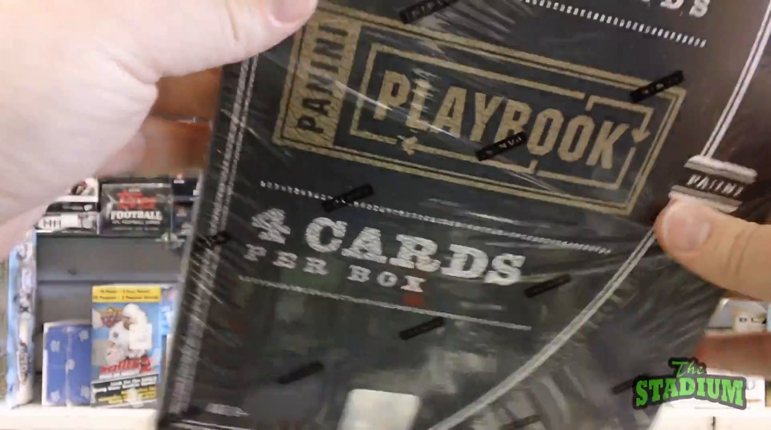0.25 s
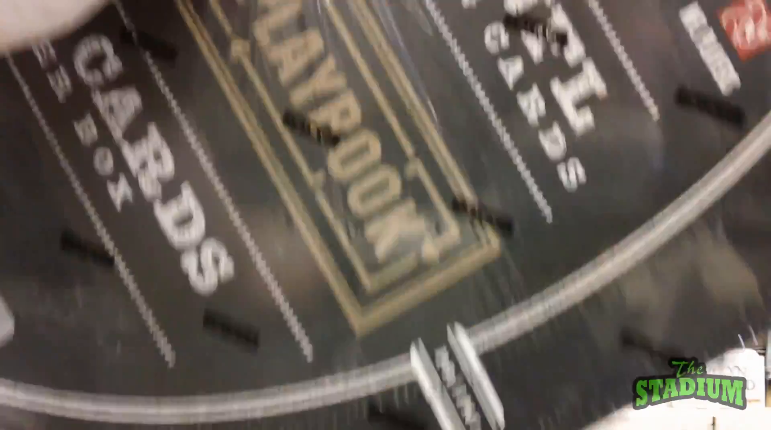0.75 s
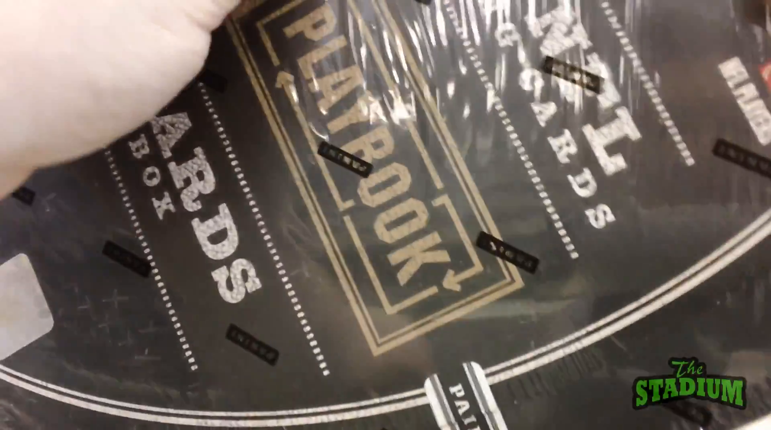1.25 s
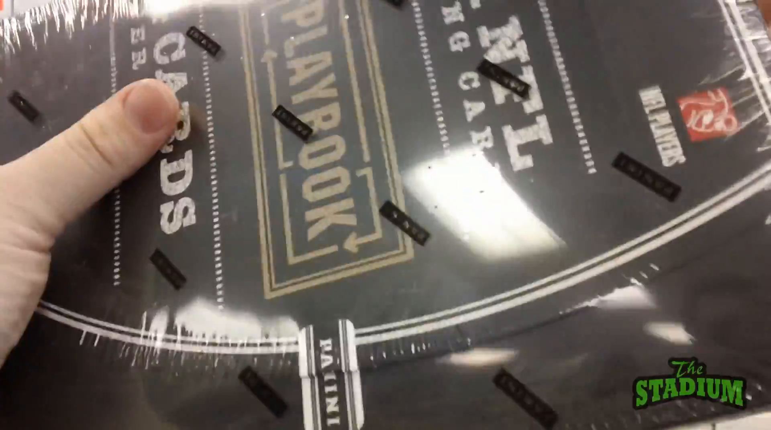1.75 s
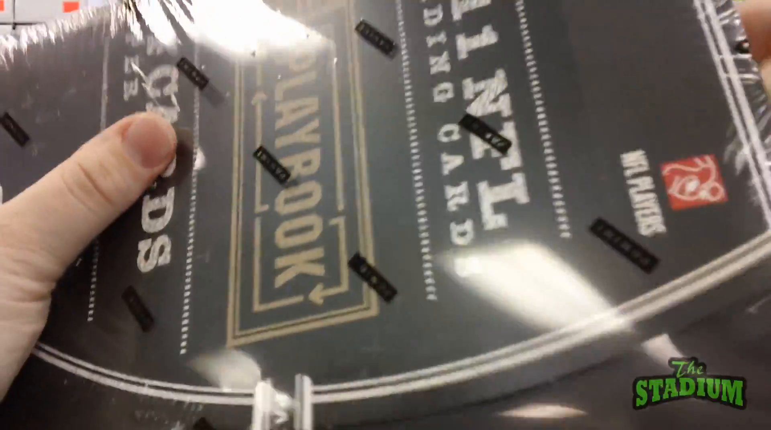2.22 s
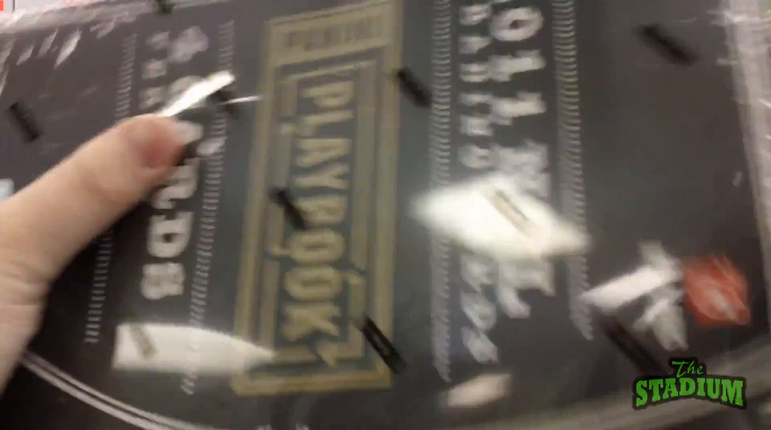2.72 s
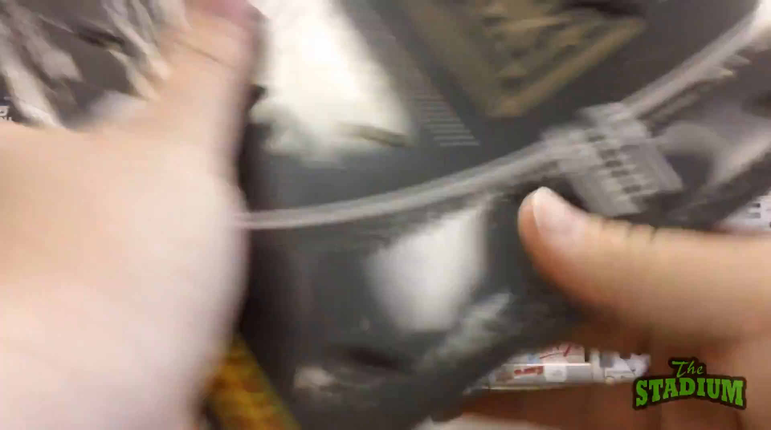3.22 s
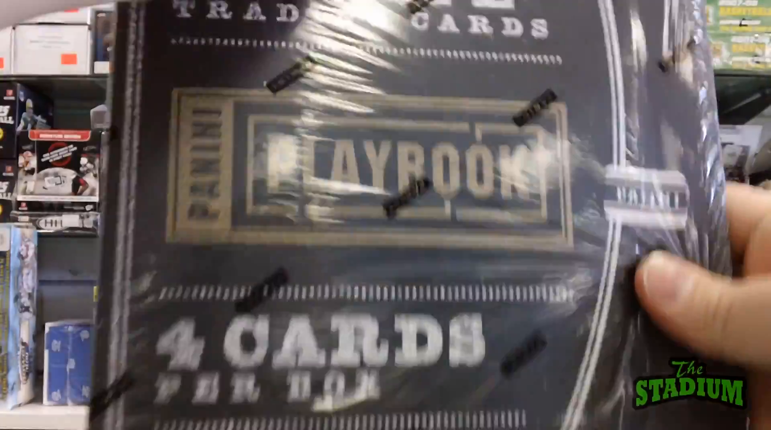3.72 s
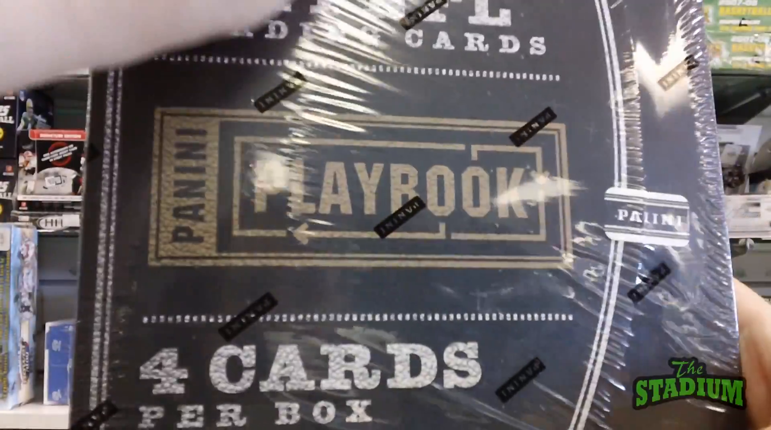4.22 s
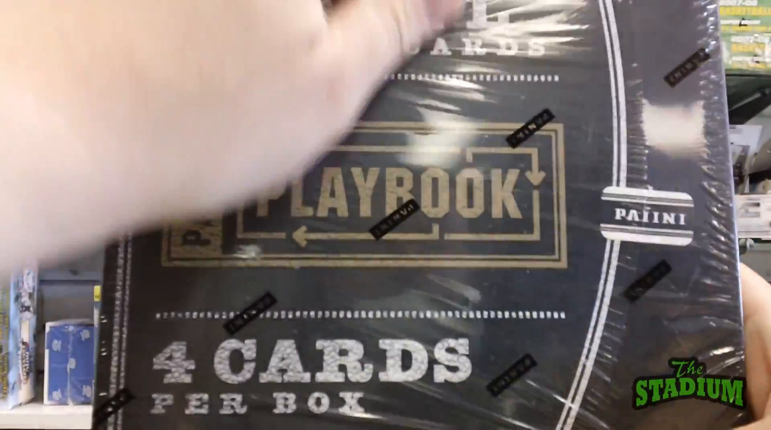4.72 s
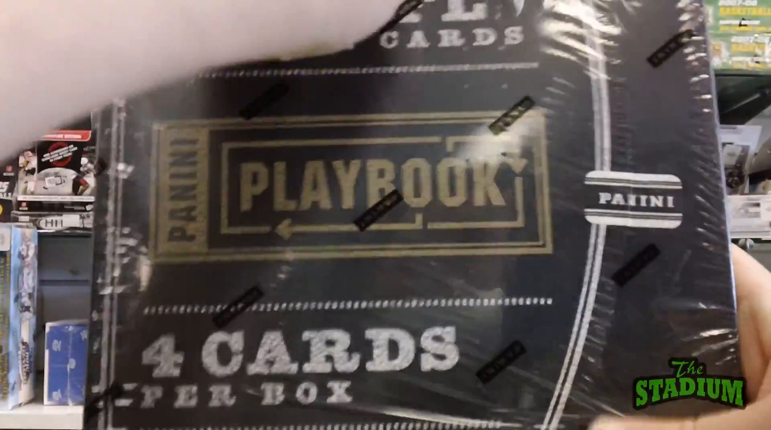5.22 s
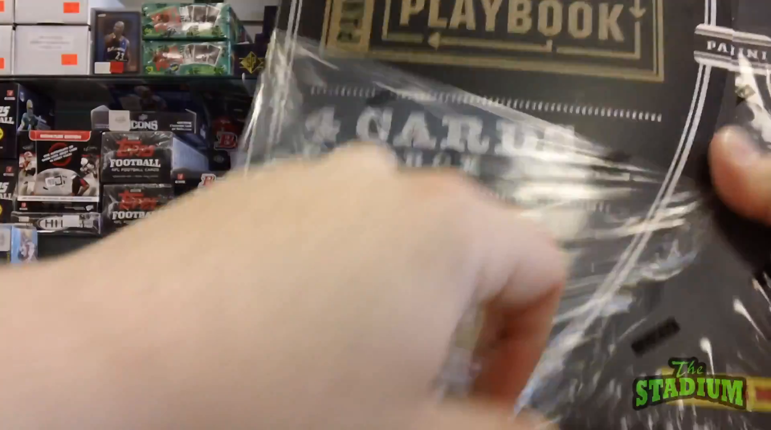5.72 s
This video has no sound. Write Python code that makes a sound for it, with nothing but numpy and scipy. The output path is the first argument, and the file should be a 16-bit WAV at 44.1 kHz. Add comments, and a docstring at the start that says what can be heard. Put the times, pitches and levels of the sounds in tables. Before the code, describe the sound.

Hands turn a hollow cardboard box in taut plastic film, crinkling and snapping, with one hard thump before the wrap is ripped off loudly.

```python
"""Film on a hollow cardboard box stirs faintly, then hisses and rubs in short strokes as hands turn the box.
Taut folds of film snap and small creases tick, made as filtered noise bursts; the panels thump as damped cosines.
The hardest thump comes just before 3.7 s; from about 5.3 s close, loud strokes and snaps rip the film off.
Ventilation noise, mains hum and a short room answer lie beneath; the gain drops after loud moments."""
import sys
import numpy as np
from scipy import signal
from scipy.fft import rfft, irfft, next_fast_len
from scipy.io import wavfile
from scipy.ndimage import uniform_filter1d, map_coordinates

SR = 44100
rng = np.random.default_rng(int(sys.argv[2]) if len(sys.argv) > 2 else 0)


def put_to_file(sound):
    """Save the sound as 16-bit audio at rate SR, in the file named by the first command-line argument."""
    columns = np.atleast_2d(sound).T  # one column per channel
    safe = np.clip(columns, -1, 1)
    whole_steps = np.round(safe * 32767)
    wavfile.write(sys.argv[1], SR, whole_steps.astype(np.int16))


N = 262836
TOP_HZ = 15600  # upper band limit

# Strokes of the hands that drag the film over the box, ending in the long rip. Each row: start in seconds,
# length in seconds, relative hiss level in dB, swell over the stroke in dB, rub gain over hiss gain in dB,
# resonance of the stretched sheet in Hz, crinkle share 0-1, treble tilt in dB per octave.
HAND_STROKES = [(0.029, 0.075, -55, -1, -6, 2420, 0, 1), (0.386, 0.29, -50, -3, -12, 2450, 0.8, 2.5),
                (0.709, 0.081, -52, -12, 8.5, 990, 1, 3.5), (1.019, 0.18, -48, -6, -2, 2000, 1, 1),
                (1.368, 0.042, -40, -10.5, 0.5, 2350, 0.2, 0), (1.443, 0.13, -59, 6, 5.5, 2480, 0.7, 7),
                (1.639, 0.023, -46, -1, 7, 2200, 0.4, -1), (1.692, 0.09, -47, -1.5, 8, 1480, 0.9, 7.5),
                (1.832, 0.08, -52.5, -13, 5.5, 1110, 1, -2),
                (2.301, 0.065, -47.5, -1.5, 10, 1100, 0.46, 0.5),
                (2.419, 0.089, -32, -2, -1.5, 2670, 0.48, -7), (2.664, 0.05, -42, -1, 5.5, 2260, 0, -0.5),
                (2.724, 0.19, -32.5, 3.5, 3, 2240, 0.07, -2),
                (2.855, 0.014, -23.5, 14, -20, 2430, 0.06, 0.5),
                (3.268, 0.0624, -41, 3, -1.5, 2920, 0.88, 2), (3.331, 0.14, -40, 0, 3, 2680, .55, 4),
                (3.502, 0.18, -51, -0.5, -3, 2440, 0.53, 2), (3.878, 0.0243, -44.5, 3, 8.5, 2270, 0.53, 0),
                (4.078, 0.047, -55.5, 11, -8, 2000, 0.7, 5), (4.287, 0.12, -45, 16, -3, 1570, 0.93, 0.5),
                (4.453, 0.28, -47, -1, -1.5, 1300, 0.36, -3), (4.69, 0.19, -42, -9, -5, 900, 0.7, 3.5),
                (4.842, 0.13, -42.5, -4.5, -1, 1500, 0.47, 3), (5.058, 0.065, -44, -7, 0, 1470, 0.58, 0.5),
                (5.153, 0.041, -36, -0.5, 3.5, 1110, 0.3, 0), (5.312, 0.11, -35.5, 7, -1, 890, 0.1, -5),
                (5.433, 0.082, -30, 1.5, 0, 400, 0.47, -1.5), (5.512, 0.12, -24, 4, -6.5, 1730, 0.44, -0.7),
                (5.653, 0.097, -33, -15.5, -19, 2350, 0.54, -1),
                (5.79, 0.045, -33.5, -7.5, -1.5, 2100, 0.4, 2),
                (5.859, 0.1, -33.5, 5, -4.5, 2100, 0.6, 0.5)]


def amp(db):
    """Decibels to gain."""
    return 10 ** (np.asarray(db) / 20)


def unit(x):
    """Scale to rms 1."""
    return x / np.sqrt(np.mean(x ** 2) + 1e-20)


def along(points, hz):
    """Interpolate (Hz, value) points on a log frequency axis."""
    point_hz, value = np.transpose(points)
    return np.interp(np.log(hz + 1), np.log(point_hz + 1), value)


def wobble(rate_hz):
    """A smooth random curve with rate_hz knots a second."""
    knots = rng.standard_normal(int(N * rate_hz / SR) + 4)
    return map_coordinates(knots, [np.arange(N) * rate_hz / SR])


def filtered(x, response):
    """Multiply the spectrum of x by a function of frequency in Hz."""
    m = next_fast_len(N + SR // 2)
    return irfft(rfft(x, m) * response(np.fft.rfftfreq(m, 1 / SR)), m)[..., :N]


def coloured(x, spectrum):
    """Filter x by (Hz, dB) points, at rms 1."""
    return unit(filtered(x, lambda hz: amp(along(spectrum, hz))))


def struck(x, spectrum):
    """Filter a short burst by (Hz, dB) points with minimum phase, so the response is causal."""
    n = len(x)
    cepstrum = irfft(np.log(amp(along(spectrum, np.fft.rfftfreq(n, 1 / SR)))))
    cepstrum[1:n // 2] *= 2
    cepstrum[n // 2 + 1:] = 0
    return irfft(rfft(x) * np.exp(rfft(cepstrum)))


def add(track, start_s, sound):
    """Mix a sound into the track in place."""
    part = track[int(start_s * SR):][:len(sound)]
    part += sound[:len(part)]


def sliding():
    """Film sticks and slips on cardboard: papery rub below, hiss above; slack film crinkles, taut film glides."""
    # Spectrum of the rub. Each row: frequency in Hz, relative level in dB.
    rub_spectrum = [(88, -36), (150, -28), (177, -1), (356, -0.5), (476, -6.5), (802, -0.5), (958, -5.5),
                    (1470, -7), (1850, -2.5), (2410, -5), (2880, -9.5), (4000, -7), (5200, -16),
                    (8800, -120)]
    # Spectrum of the film hiss. Each row: frequency in Hz, relative level in dB.
    film_spectrum = [(700, -6), (2200, -10.5), (3500, -4), (7000, -0.5), (11000, 1.5), (15000, 2.5)]
    hiss_gain, rub_gain = stroke_levels()
    _, crinkle, _ = sheet_state(np.arange(N) / SR)

    def rough(ticks):
        """Mix grains and smooth noise by crinkle share, at constant power."""
        return np.sqrt(crinkle) * ticks + np.sqrt(1 - crinkle) * rng.standard_normal(N)

    judder = crinkle * wobble(170)
    slips = grains(rate_hz=1500, centre_hz=1226, spread_octaves=1.73, cycles=1.34, scatter_db=3.0)
    rub = sheet(coloured(rough(slips), rub_spectrum), peak_db=3.5, octaves=0.2, patchy_db=2)
    buckles = grains(rate_hz=1500, centre_hz=8500, spread_octaves=1.0, cycles=1.08, scatter_db=5.0, size=64)
    hiss = sheet(coloured(rough(buckles), film_spectrum), peak_db=8.0, octaves=0.69, patchy_db=2.5)
    rub_part = rub * rub_gain * amp(3.7 * judder)
    hiss_part = hiss * hiss_gain * amp(6.0 + 2.2 * judder)
    return rub_part + hiss_part


def stroke_levels():
    """Hiss and rub gains: each stroke rises, holds while it swells or fades, and is released."""
    attack_s, release_s = 0.013, 0.014  # time per 10 dB
    rest_hiss_db, rest_rub_db = -56.5, -56  # faint stirring while the box is only held
    t = np.arange(N) / SR
    hiss, rub = np.full(N, amp(rest_hiss_db)), np.full(N, amp(rest_rub_db))
    for start_s, length_s, db, swell_db, rub_db, *_ in HAND_STROKES:
        before = np.maximum(start_s - t, 0) / attack_s
        after = np.maximum(t - start_s - length_s, 0) / release_s
        edge_db = -10 * np.minimum(before + after, 10)
        progress = np.clip((t - start_s) / length_s, 0, 1)
        gain = amp(db + swell_db * (progress - .5) + edge_db)
        hiss = np.maximum(hiss, gain)
        rub = np.maximum(rub, gain * amp(rub_db))
    return hiss, rub


def sheet_state(t):
    """Resonance, crinkle share and treble tilt of the film, interpolated between stroke centres."""
    start_s, length_s, *_, hz, crinkle, tilt = np.transpose(HAND_STROKES)
    centre_s = start_s + length_s / 2
    return [np.interp(t, centre_s, column) for column in (hz, np.clip(crinkle, 0, 1), tilt)]


def grains(rate_hz, centre_hz, spread_octaves, cycles, scatter_db, size=256):
    """Tiny slips and buckles: damped sines of random time, pitch and strength, at rms 1."""
    count = int(rate_hz * N / SR)
    when, pitch, strength = rng.random((count, 3)).T[:, :, None]
    hz = np.clip(centre_hz * 2 ** (spread_octaves * (2 * pitch - 1)), 100, TOP_HZ)
    turns = hz * np.arange(size) / SR
    gain = amp(-scatter_db * np.log(np.maximum(strength, .015)))
    waves = gain * np.sqrt(hz) * np.sin(2 * np.pi * turns) * np.exp(-turns / cycles)
    at = (when * N).astype(int) + np.arange(size)
    return unit(np.bincount(at.ravel(), waves.ravel(), N)[:N])


def sheet(x, peak_db, octaves, patchy_db):
    """The stretched sheet favours one band, and its shifting facets ring briefly at random pitches."""
    tilt_above_hz = 4600
    hz, t, z = signal.stft(x, SR, nperseg=512)
    centre_hz, _, tilt = sheet_state(t)
    offset_octaves = np.log2(hz[:, None] + 1) - np.log2(centre_hz)
    facets = uniform_filter1d(rng.standard_normal(z.shape), size=3, axis=0)
    facets = unit(uniform_filter1d(facets, size=4, axis=1))
    peak = peak_db * np.exp(-(offset_octaves / octaves) ** 2)
    lean_db = 2.6 * np.clip(-offset_octaves - 1.2, 0, 2)  # a tight, high-pitched sheet radiates little bass
    treble_db = tilt * np.log2(np.maximum(hz[:, None] / tilt_above_hz, 1))
    gain_db = peak - lean_db + treble_db + patchy_db * facets
    return unit(signal.istft(z * amp(gain_db), nperseg=512)[1][:N])


def snaps(size=4096):
    """A faint swell leads into each crack; a fold flips with the crack and crackles out in its patch; folds on
    the box knock."""
    # The loudest folds. Each row: time in seconds, relative level in dB, pitch of the film patch in Hz,
    # t60 of the crackle in seconds.
    loud_folds = [(0.409, -29.5, 10500, 0.0062), (0.4438, -32.5, 8500, .007), (0.4566, -40, 8500, .01),
                  (0.511, -30.5, 9700, 0.0094), (0.528, -36.5, 2830, 0.02), (0.581, -31, 11600, 0.0043),
                  (0.5899, -29, 11500, 0.0033), (0.6345, -35, 9000, 0.033), (0.7076, -27.5, 1920, 0.022),
                  (0.7709, -36.5, 600, 0.019), (0.8768, -27.5, 476, .024), (1.1518, -32, 1150, 0.012),
                  (1.2091, -30, 10050, .004), (1.2647, -33, 750, 0.049), (1.3558, -27.5, 2200, 0.021),
                  (1.3717, -30.5, 745, 0.036), (1.4595, -41.5, 3840, .006), (1.4998, -32.5, 11100, .005),
                  (1.6378, -33, 2320, 0.036), (1.7097, -37, 1264, .0044), (1.7313, -31, 2300, 0.024),
                  (1.8268, -33.5, 910, 0.0062), (1.8429, -36, 1000, 0.01), (1.9026, -33, 990, 0.039),
                  (1.9895, -34.5, 720, 0.027), (2.0093, -31, 760, 0.0065), (2.0945, -23, 1060, 0.011),
                  (2.1015, -37, 5070, 0.0095), (2.1498, -31, 1880, 0.018), (2.2944, -31, 690, 0.013),
                  (2.3282, -24.5, 1750, 0.0053), (2.3838, -36.5, 7960, 0.0057), (2.4055, -30, 6600, 0.0036),
                  (2.4953, -29, 3240, 0.065), (2.599, -41, 9800, 0.004), (2.6603, -34, 950, 0.01),
                  (2.8518, -22.5, 1020, 0.0083), (2.8724, -18.5, 3780, .0084), (2.9977, -22, 2050, 0.01),
                  (3.2476, -31.5, 4270, 0.018), (3.2704, -38.5, 1103, .028), (3.3288, -27.5, 1190, 0.012),
                  (3.3661, -25, 3080, 0.015), (3.382, -29, 2430, 0.009), (3.6944, -23.5, 2540, 0.081),
                  (3.698, -20, 448, 0.036), (3.7192, -28, 710, .022), (3.747, -42, 2600, .008),
                  (3.82, -33, 1300, 0.07), (4.1197, -35.5, 1240, 0.042), (4.3744, -25, 1630, 0.014),
                  (4.3846, -27.5, 8490, 0.023), (4.4571, -29, 1324, .029), (4.4634, -26, 755, 0.032),
                  (4.4929, -32, 6100, .0063), (4.6024, -33.5, 1510, 0.054), (4.6646, -35, 9000, 0.0071),
                  (4.7179, -34, 1080, 0.031), (4.7751, -29.5, 7900, .0045), (4.7982, -30, 770, 0.01),
                  (4.8815, -29.5, 980, 0.016), (4.897, -30, 1400, 0.044), (4.9163, -29.5, 10050, .034),
                  (5.1493, -27, 1450, 0.063), (5.3067, -31.5, 7500, 0.0043), (5.317, -30.5, 1780, 0.016),
                  (5.3247, -26, 1280, 0.018), (5.3413, -25, 5040, 0.002), (5.4875, -24.5, 10400, .003),
                  (5.5488, -27, 2390, 0.037), (5.5607, -28, 9000, .008), (5.5856, -24, 1130, 0.01),
                  (5.6219, -32, 7420, .004), (5.641, -22.5, 4000, 0.013), (5.709, -32, 8000, .016),
                  (5.7342, -30.5, 5950, 0.0035), (5.7571, -33.5, 1340, 0.024), (5.775, -29, 9100, 0.0033),
                  (5.825, -25.5, 5730, .0045)]
    # Hollow knock of a large patch on the box. Each row: patch pitch in Hz, boost in dB.
    knock_points = [(500, 13.5), (850, 15.5), (1300, 10.5), (2200, 4), (6000, 5)]
    # Crisp treble of a small patch. Each row: patch pitch in Hz, boost in dB.
    crisp_points = [(750, -12), (1200, 0.5), (2300, -6.5), (5000, 3.5), (9000, 13), (11500, 45)]
    out, onset = np.zeros(N), size // 16
    t = (np.arange(size) - onset) / SR
    for time_s, db, hz, t60_s in [*loud_folds, *small_ticks()]:
        knock_db, crisp_db = along(knock_points, hz), along(crisp_points, hz)
        lead_in = 0.29 * amp(-60 * abs(t) / 0.0047)
        crackle = amp(-60 * abs(t) / t60_s) + 0.064 * amp(-60 * abs(t) / 0.088)
        ragged = amp(3 * np.interp(t, t[::64], rng.standard_normal(size // 64)))
        burst = ragged * rng.standard_normal(size) * np.where(t < 0, lead_in, crackle)
        burst[onset] = 3.0  # the crack
        patch = signal.iirpeak(min(hz, TOP_HZ), 5.5, SR)
        burst = burst + 1.27 * signal.lfilter(*patch, burst)
        colour = [(60, knock_db - 25.5), (300, knock_db - 4), (750, knock_db), (1400, knock_db / 2 - 0.5),
                  (2300, 4.2), (4000, crisp_db / 3 + 0.5), (8000, crisp_db), (15000, 1.13 * crisp_db + 0.5)]
        snap = struck(burst, colour)
        add(out, time_s + t[0], snap / np.linalg.norm(snap) * amp(db + 27.0))
    return out


def small_ticks(count=80):
    """Small creases give way at random moments of the strokes, louder in harder ones; rows as in loud_folds."""
    ticks_per_stroke_s, tick_hz, spread_octaves = 20, 5170, 1.0
    tick_db, scatter_db = -43.5, 2.45
    growth = 0.26  # dB of tick per dB of stroke
    start_s, length_s, db, *_ = np.transpose(HAND_STROKES)
    pick, when, size, pitch = rng.random((count, 4)).T
    k = np.searchsorted(np.cumsum(length_s) / length_s.sum(), pick)
    time_s = start_s[k] + when * length_s[k]
    level_db = tick_db + growth * (db[k] - db.mean()) - scatter_db * np.log(np.maximum(size, .05))
    hz = tick_hz * 2 ** (spread_octaves * (2 * pitch - 1))
    rows = np.transpose([time_s, level_db, hz, np.full(count, 0.005)])
    return rows[:int(ticks_per_stroke_s * length_s.sum())]


def thumps(size=8192):
    """A panel of the box is pushed, swings back in a quickly damped cosine, and the box rings."""
    # Blows on the box. Each row: time in seconds, relative level in dB, panel pitch in Hz.
    blows = [(0.7084, -21, 288), (0.877, -12, 113), (1.356, -25, 76.5), (1.645, -33, 65), (2.854, -22, 240),
             (2.871, -18.5, 193), (2.998, -19, 197), (3.274, -26, 103), (3.329, -22, 97),
             (3.6983, -1.5, 214), (3.7113, -20.5, 111.5), (3.890, -25, 192), (4.463, -21, 190),
             (5.149, -27.5, 136), (5.172, -34, 55)]
    # Ring of the box. Each row: frequency in Hz, level against the swing in dB, t60 in seconds.
    box_modes = [(238, -34, 0.21), (444, -39, 0.42), (653, -10, 0.018), (1060, -42, 0.087),
                 (2530, -28, 0.046)]
    colour = [(25, 4), (100, 2), (250, 3.5), (560, 3.5), (1100, -5), (5000, -5), (15000, 11)]
    out, t = np.zeros(N), np.arange(size) / SR
    for time_s, db, hz in blows:
        swing = np.cos(2 * np.pi * hz * t) * np.exp(-hz * t / 0.61)
        ring = sum(amp(level_db - 60 * t / t60_s) * np.sin(2 * np.pi * mode_hz * t)
                   for mode_hz, level_db, t60_s in box_modes)
        add(out, time_s, amp(db) * struck(swing + ring, colour))
    return out


def room(x):
    """The answer of shelves and walls: decaying noise after a short delay; the bass dies last."""
    # Decay of the room. Each row: frequency in Hz, t60 in seconds.
    decay_points = [(100, 0.41), (400, 0.14), (2000, 0.15), (12000, 0.12)]
    delay_s = 0.0055
    hz, t, z = signal.stft(rng.standard_normal(SR // 2), SR, nperseg=256)
    decay = amp(-60 * t / along(decay_points, hz)[:, None])
    tail = signal.istft(z * decay, SR, nperseg=256)[1]
    tail = np.pad(tail / np.linalg.norm(tail), (int(delay_s * SR), 0))
    return signal.fftconvolve(x, tail)[:N]


def background():
    """Ventilation as coloured noise, and mains hum as sines slightly unsteady in level and phase."""
    # Spectrum of the ventilation. Each row: frequency in Hz, relative level in dB.
    air_spectrum = [(25, -5), (70, -5), (110, 3), (170, 0.5), (330, -2), (500, -10), (700, -12),
                    (1300, -15.5), (2200, -20.5), (3400, -23), (9500, -31.5), (15000, -55)]
    # Mains hum. Each row: frequency in Hz, mean level in dB rms.
    hum_partials = [(120, -47), (240, -63.5), (360, -59.5)]
    t = np.arange(N) / SR
    drift_rad = 0.22 * wobble(7)
    hum = sum(amp(db + wobble(4.27)) * np.sqrt(2) * np.sin(2 * np.pi * hz * t + drift_rad)
              for hz, db in hum_partials)
    return hum + amp(-43.5) * coloured(rng.standard_normal(N), air_spectrum)


def scene():
    """Film, box, their room answers and the background reach one close microphone."""
    film, box = sliding() + snaps(), thumps()
    answers = amp(-17.5) * room(film) + amp(-10.0) * room(box)
    mono = film + box + answers + background()
    return np.array([mono, mono])


def gain_control(x, threshold_db, slope, recovery_db_per_s):
    """The gain drops just after a loud moment and recovers at a steady rate in dB."""
    keep = np.exp(-1 / (0.01 * SR))  # 10 ms smoothing
    power = signal.lfilter([1 - keep], [1, -keep], x[0] ** 2)
    level_db = 10 * np.log10(power + 1e-12)
    ramp_db = recovery_db_per_s * np.arange(N) / SR
    wanted_cut_db = slope * np.maximum(level_db - threshold_db, 0)
    cut_db = np.maximum.accumulate(wanted_cut_db + ramp_db) - ramp_db
    return x * amp(-signal.lfilter([1 - keep], [1, -keep], cut_db))


def record(dry):
    """The microphone has a treble notch; then gain control, clipping and the band limit."""
    notch_hz, floor_width_hz, notch_width_hz = 12600, 130, 2600

    def notch(hz):
        """Complex second-order notch response."""
        detune = notch_hz ** 2 - hz ** 2
        return (detune + 1j * floor_width_hz * hz) / (detune + 1j * notch_width_hz * hz)

    heard = filtered(dry, notch)
    held = gain_control(heard, threshold_db=-25.5, slope=0.4, recovery_db_per_s=6.0)
    return filtered(np.clip(held, -1, 1), lambda hz: 1 / (1 + (hz / TOP_HZ) ** 120))


dry = scene()
out = record(dry)
put_to_file(out)
```